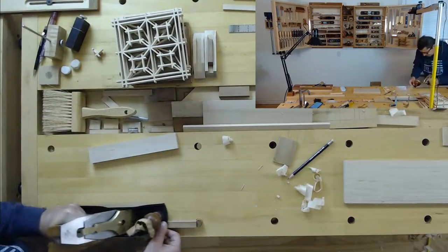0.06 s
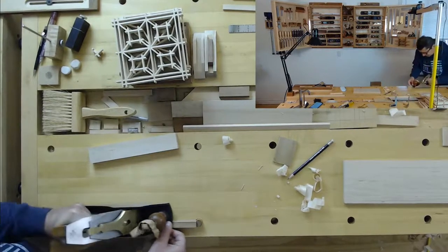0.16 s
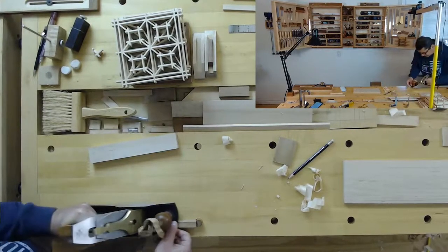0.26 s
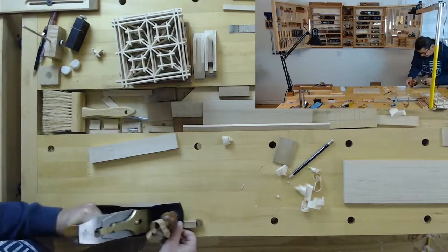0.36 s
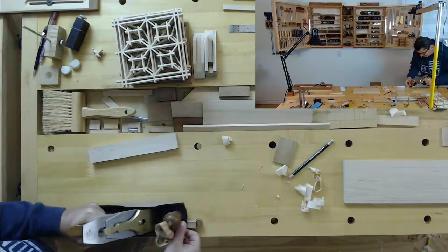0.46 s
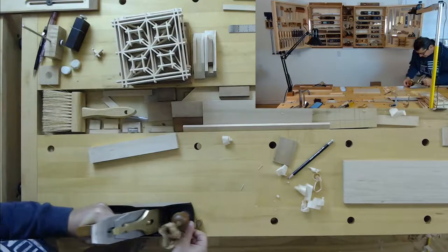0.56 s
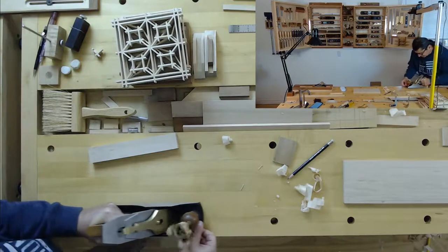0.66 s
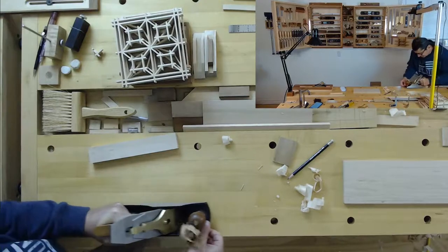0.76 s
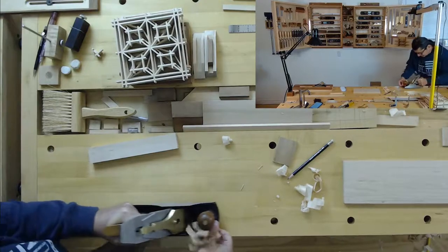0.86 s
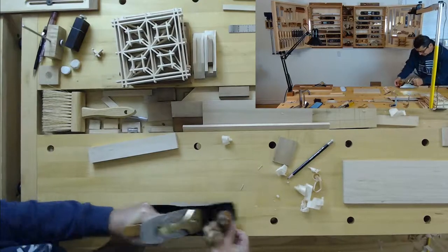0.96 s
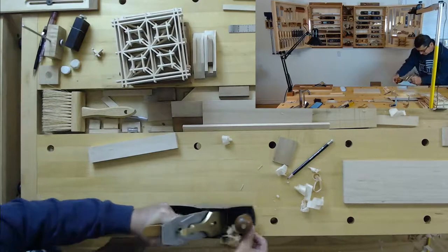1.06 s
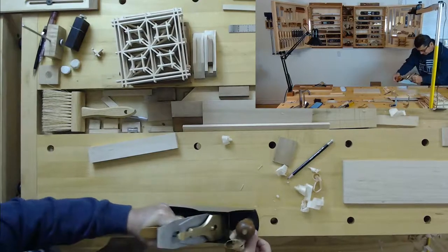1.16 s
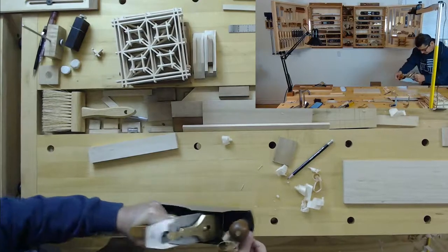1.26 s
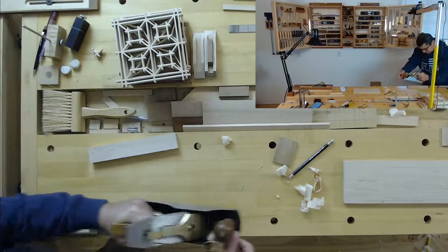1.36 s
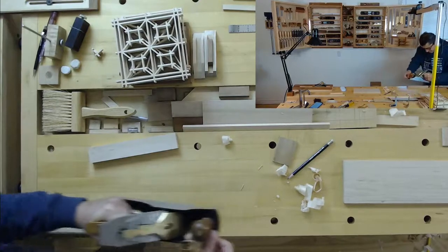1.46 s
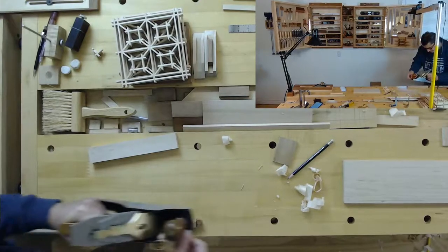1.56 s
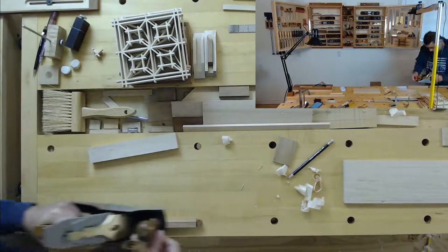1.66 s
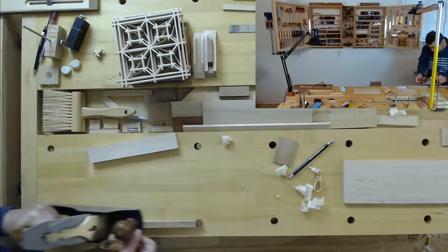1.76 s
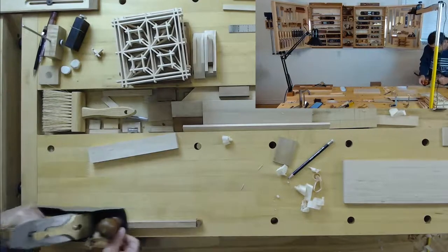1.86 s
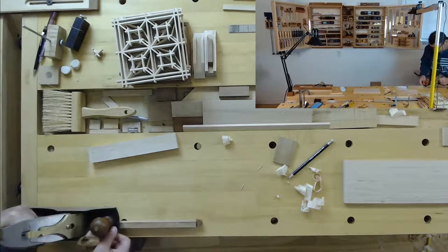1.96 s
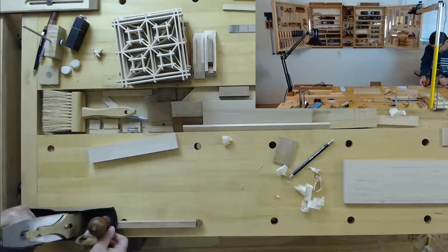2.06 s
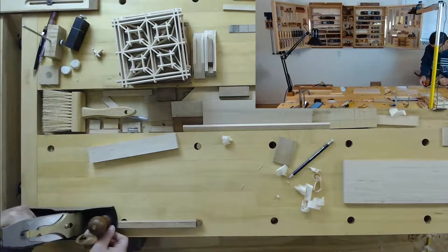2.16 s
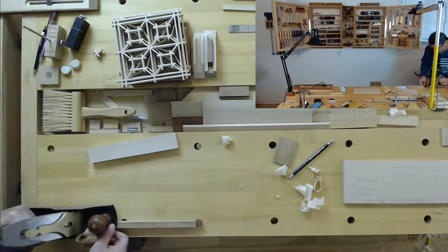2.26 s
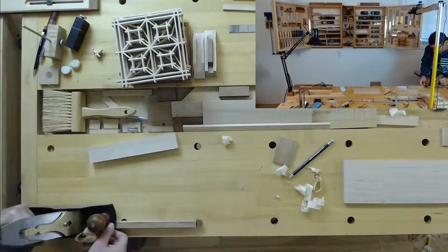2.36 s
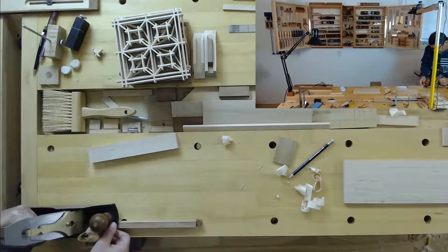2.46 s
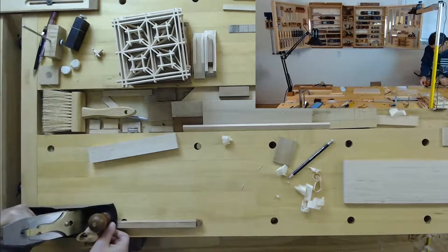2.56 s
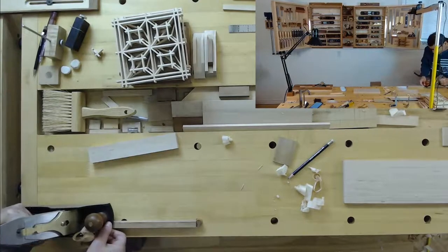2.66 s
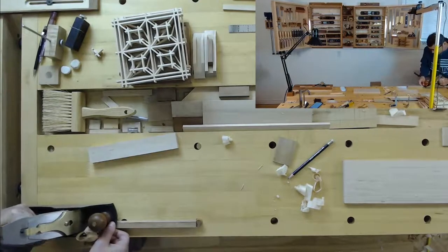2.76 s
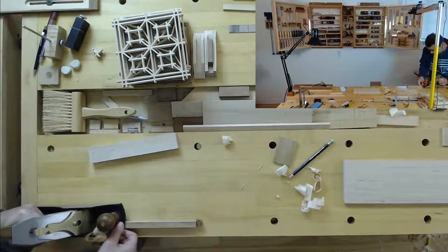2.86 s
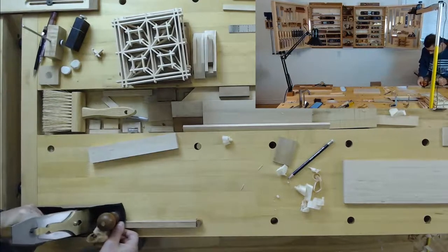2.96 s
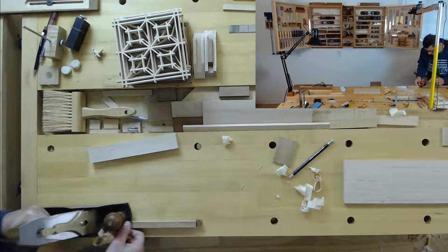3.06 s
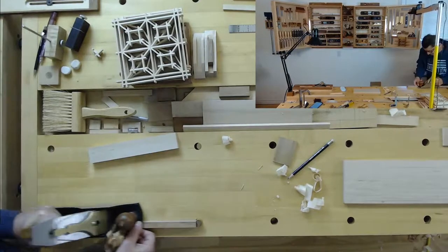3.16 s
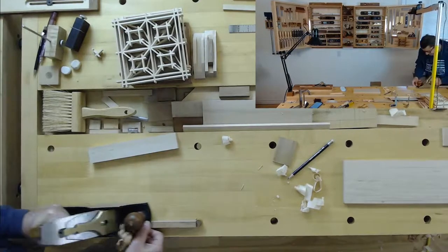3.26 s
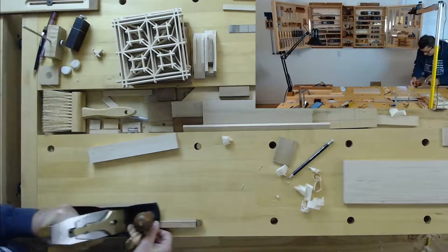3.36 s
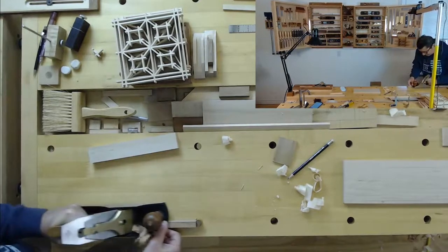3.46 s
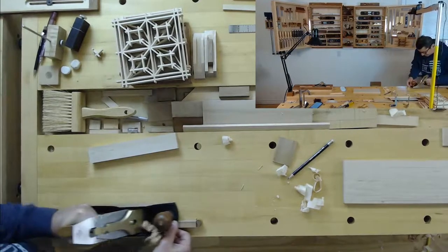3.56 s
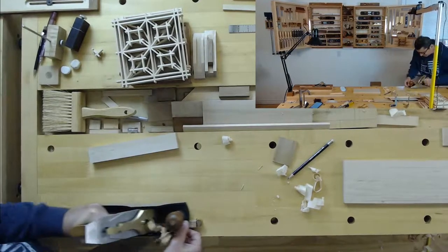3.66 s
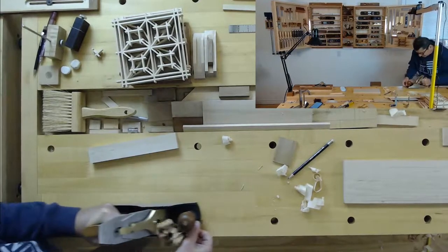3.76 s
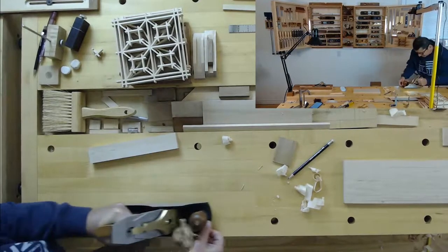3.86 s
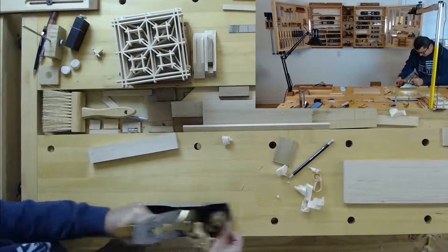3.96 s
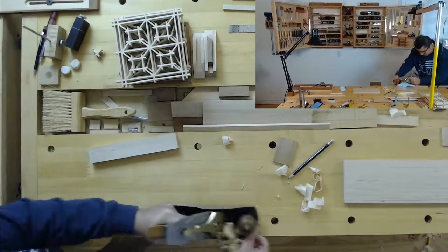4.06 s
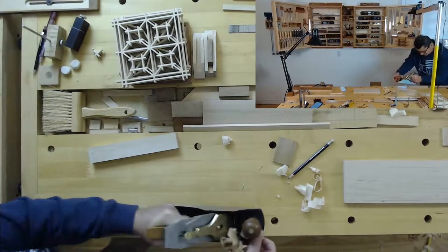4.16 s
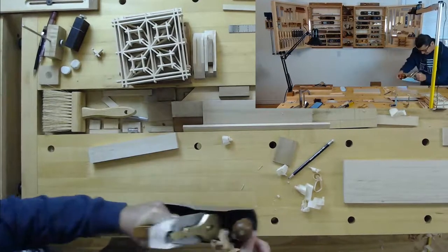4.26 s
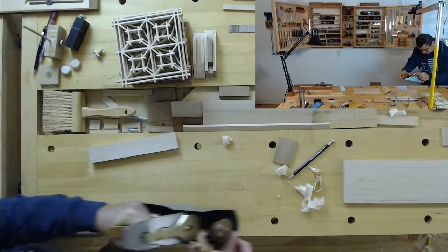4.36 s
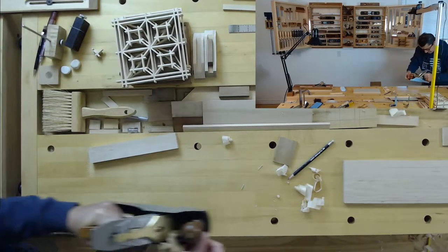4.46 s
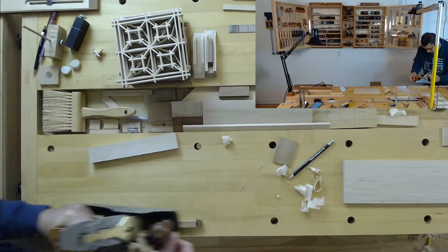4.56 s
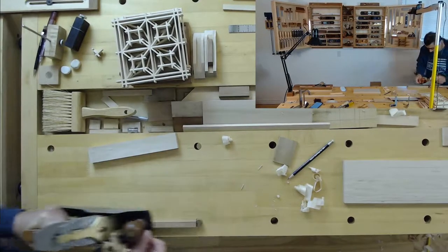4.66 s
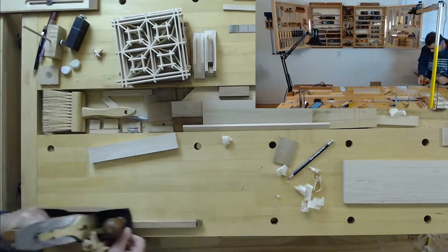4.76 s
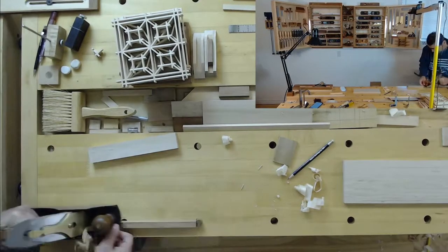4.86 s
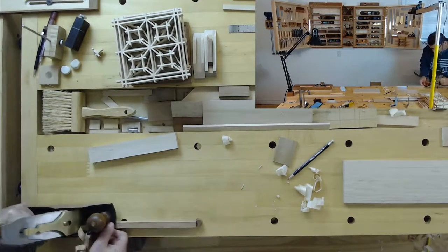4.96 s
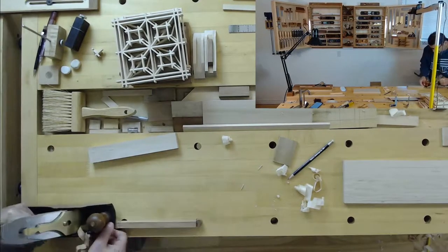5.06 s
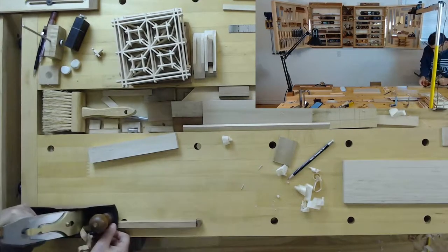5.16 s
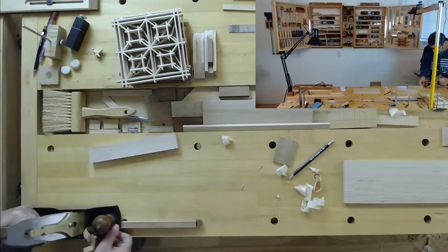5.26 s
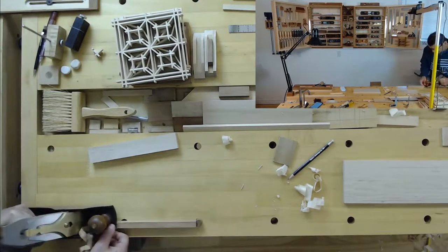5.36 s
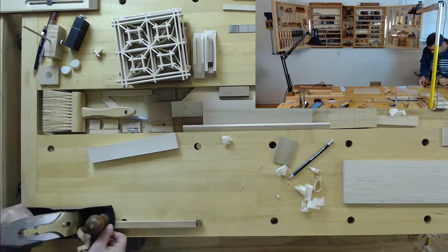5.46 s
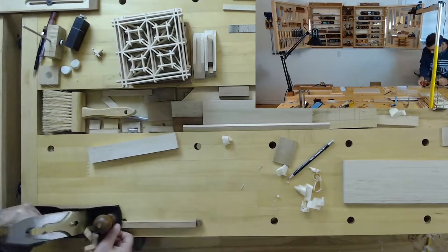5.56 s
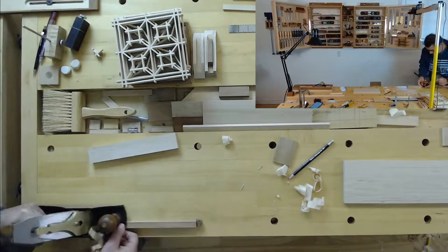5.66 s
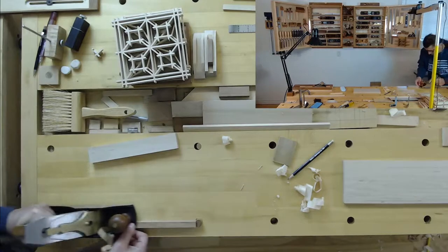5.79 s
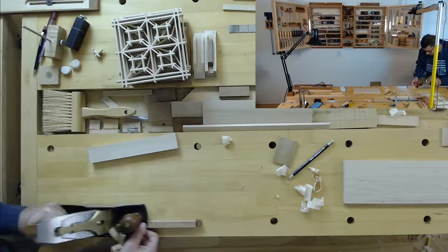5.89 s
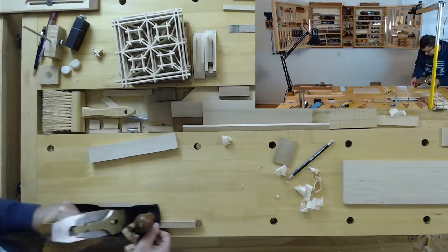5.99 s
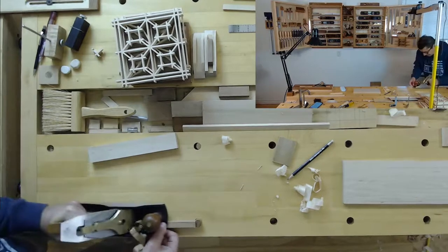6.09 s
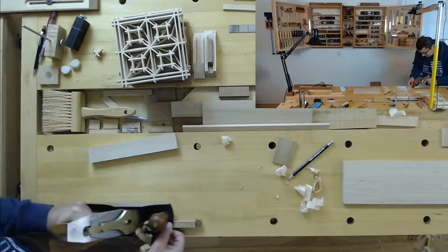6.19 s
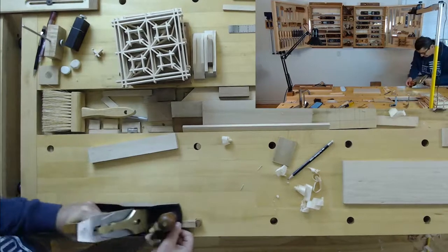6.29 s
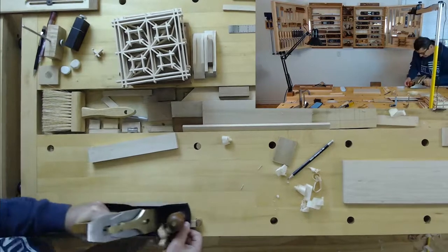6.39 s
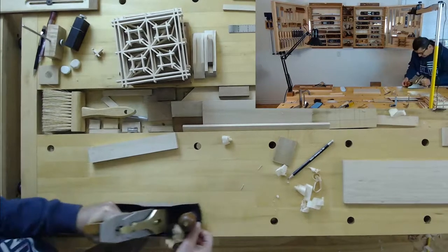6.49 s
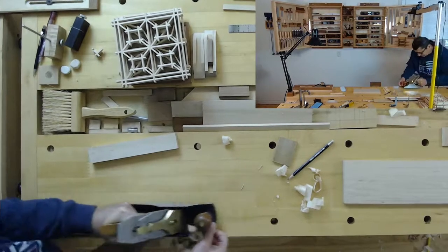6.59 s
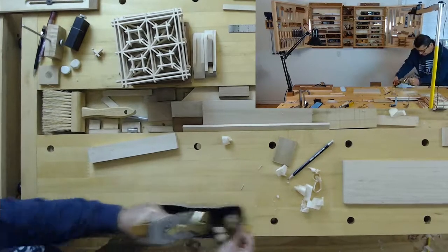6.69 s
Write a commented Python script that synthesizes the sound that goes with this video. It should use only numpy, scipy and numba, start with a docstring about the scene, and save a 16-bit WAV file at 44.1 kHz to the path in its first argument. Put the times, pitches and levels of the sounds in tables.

```python
"""Hand plane in a bare workshop.

One distant microphone hears a metal plane pushed three times along a strip of wood on a heavy bench.
Fibres snap at the blade and ring plane and bench, and the shaving hisses out. Between strokes the plane
is set down with knocks, dry shavings crack, sole and sleeve brush. The bare room echoes, and the bench,
shoved by arms and body, sways at its lowest note, which reaches the microphone through the floor."""
import sys
import numpy as np
from scipy import signal
from scipy.io import wavfile
from scipy.ndimage import uniform_filter1d
from numba import njit

SR = 44100
rng = np.random.default_rng(int(sys.argv[2]) if len(sys.argv) > 2 else 0)


def pcm_store(signal):
    """Save signal as 16-bit PCM."""
    levels = np.round(np.clip(np.atleast_2d(signal), -1, 1) * 32767)
    wavfile.write(sys.argv[1], SR, levels.astype(np.int16).T)


N = 296793

# One list a stroke. Each row: time in seconds, then blade bite, strip groan and hiss in dB.
STROKES = [
    [(0.0, -55.5, -35.5, -56.5), (0.11, -49, -37, -52), (0.32, -46, -36, -52), (0.42, -60, -40, -57.5),
     (0.49, -35, -39.5, -42.5), (0.58, -41.5, -34, -47), (0.72, -45.5, -37.5, -50),
     (0.8, -37.5, -39.5, -45), (0.88, -45, -28.5, -62)],
    [(2.9, -62, -69, -60.5), (2.95, -45.5, -38, -49.5), (3.08, -43.5, -43.5, -49),
     (3.21, -43.5, -39.5, -51), (3.28, -44.5, -44.5, -47.5), (3.43, -41, -37, -47.5),
     (3.51, -34.5, -44.5, -45.5), (3.62, -38.5, -38.5, -43), (3.75, -38.5, -40, -44),
     (3.85, -36, -39, -38.5), (3.9, -35, -29, -58)],
    [(5.64, -59, -64, -59), (5.67, -48.5, -51, -47.5), (5.75, -47.5, -43, -49.5), (5.91, -44, -51, -47),
     (6.07, -50, -37, -55), (6.12, -44, -41, -49.5), (6.18, -41, -38.5, -48.5), (6.26, -42.5, -40.5, -46.5),
     (6.34, -39, -38.5, -46), (6.44, -39.5, -40, -40), (6.52, -35.5, -46, -39.5), (6.575, -31, -32, -33.5),
     (6.61, -55, -29.5, -77), (6.67, -42, -55, -65)],
]
# Notes that move during the cut. Each row: time in seconds, pitch in Hz.
BLADE_HZ = [(0.1, 825), (0.48, 1180), (0.58, 765), (0.72, 720), (0.8, 1000), (0.86, 820), (2.95, 640),
            (3.1, 1050), (3.3, 950), (3.44, 785), (3.49, 1530), (3.58, 1250), (3.68, 955), (3.76, 750),
            (3.87, 1120), (5.7, 790), (5.85, 1150), (5.92, 1570), (5.96, 1130), (6.1, 520), (6.22, 860),
            (6.4, 850), (6.47, 1080), (6.57, 1335), (6.67, 1320)]  # the part of the plane's ring that the loaded blade favours
STRIP_HZ = [(0.1, 375), (0.24, 347), (0.33, 267), (0.46, 230), (0.52, 320), (0.8, 307), (2.95, 354),
            (3.5, 327), (5.75, 380), (6.3, 344)]  # set by where the sole presses on the strip
CURL_HZ = [(0.12, 5940), (0.25, 4700), (0.5, 3760), (0.9, 3600), (2.93, 4470), (3.2, 5300), (3.4, 5500),
           (3.52, 4200), (3.65, 3500), (3.9, 3450), (5.66, 4400), (5.92, 5100), (6.1, 5450), (6.25, 4400),
           (6.4, 3820), (6.6, 3700)]  # the shaving is a small hollow whose note drops as it rolls up
# Treble near 8 kHz within the hiss. Each row: time in seconds, relative level in dB.
SHEEN_DB = [(0.05, -23), (0.25, -2), (0.5, -2), (0.77, 7), (0.86, 5), (2.95, 6), (3.07, 6), (3.25, -1),
            (3.5, -12), (3.78, 4.5), (3.85, 0), (3.9, -9), (5.7, 4.5), (5.84, 2), (6.08, -8), (6.25, -6),
            (6.45, 1), (6.6, 0)]

# Resonances. Each row: centre in Hz, width in Hz, gain in dB.
PLANE_MODES = [(562, 58, -5.5), (689, 64, -1.5), (763, 65, -1), (937, 85, -6), (1037, 56, -4.5),
               (1109, 95, -5), (1237, 81, -3.5), (1362, 110, -4.5), (1481, 177, -7), (1640, 210, -15)]
BENCH_MODES = [(124.3, 22.4, -10), (141.7, 11, -9), (231, 60, -3.5), (308.2, 38, 2.5), (409, 49, -1.5),
               (466, 167, -8.5)]
FIBRE_MODES = [(1820, 255, 4.5), (2170, 180, 5), (2445, 244, 3.5), (2950, 550, 1.5), (3794, 550, -4),
               (4500, 300, -6.5)]
SHAVING_MODES = [(4730, 2140, -4.5), (6420, 960, 0.5), (7110, 850, -1)]
SHEEN_MODES = [(7880, 500, -6.5), (8370, 1130, -11), (8950, 370, -5.5)]
HISS_TOP_MODES = [(11000, 1300, -10), (12900, 710, 7), (13700, 1700, 0.5)]
STRUCK_STRIP_MODES = [(447, 45, -1), (593, 74, 0), (706, 104, 1), (920, 120, -6.5)]
STRUCK_PLANE_MODES = [(1050, 146, -5), (1200, 130, -1), (1357, 123, -2), (1770, 550, -13.5),
                      (2270, 620, -15.5)]
HEEL_MODES = [(335, 104, -0.98), (485, 100, -2), (695, 155, 1)]  # the heel lands flat and dull
FRAME_MODES = [(67, 10, 2), (125.6, 49, 4.9)]
CLICK_MODES = [(3080, 1500, 0.5), (6650, 3500, -4), (12500, 6000, -18)]  # dry contact, too short to ring
IRON_MODES = [(2090, 220, 3), (2550, 450, -4.5)]
SLEEVE_MODES = [(1250, 690, 20.5), (3150, 1800, 16.5), (6800, 1500, -2)]
PAPERY_MODES = [(6750, 2900, 12), (12000, 8500, -11)]

# Arms and body shove the bench. Each row: time of full swing in seconds, level in dB, hold in seconds.
SHOVES = [(0.0, -36, 0.056), (0.39, -35, .01), (0.51, -36, .02), (0.67, -32.5, 0.2), (0.94, -22, 0.0083),
          (1.07, -29, 0.088), (1.33, -36.5, 0.1), (2.1, -37, 0.17), (2.47, -37, 0.12), (2.83, -24.5, 0.17),
          (3.3, -30, 0.018), (3.47, -33.5, 0.038), (3.8, -33, .01), (3.94, -30, 0.087),
          (4.14, -34.5, 0.0078), (4.27, -39, .02), (4.5, -42.5, 0.0093), (4.67, -43.5, .01),
          (4.97, -34, 0.092), (5.17, -28, 0.0048), (5.42, -37.5, 0.028), (5.6, -25.5, 0.2),
          (5.99, -20.5, 0.16), (6.26, -27, 0.21), (6.67, -30, 0.016)]
# The lowest note of the bench. Each row: time in seconds, pitch in Hz.
SWAY_HZ = [(0.0, 28.96), (5.6, 29.43), (5.98, 31.4), (6.73, 32.8)]
# Room tone. Each row: frequency in Hz, relative spectral density in dB.
ROOM_TONE = [(24, -29), (40, 4), (83, -2.5), (120, -27), (166, -7.5), (399, -15), (440, -11), (552, -19),
             (1830, -26), (2730, -33), (15700, -41.5)]
# The blade catches. Each row: peak time in seconds, level in dB, rise and fade in seconds.
CATCHES = [(0.46, -41, .012, 0.026), (0.79, -41, 0.02, 0.05), (0.834, -34.5, .012, 0.018),
           (3.066, -36.5, 0.0072, 0.033), (3.48, -44, .015, 0.032), (3.871, -30.5, 0.033, 0.018),
           (5.814, -39.5, 0.0076, 0.014), (5.915, -35, 0.0087, 0.028), (6.565, -32.5, .015, 0.026)]
# Plane meets wood. Each row: time in seconds, level in dB, then offsets in dB for the plane's ring,
# bench top, thud, click and heel.
KNOCKS = [(0.845, -31, -6, -16, -2, -22, -6), (2.039, -29.5, 1, -23.5, -20, -34, -7.5),
          (2.157, -47.5, 0, -18, 4.5, -20, -11), (2.617, -60, 0, 2, 7, -11, -6),
          (2.69, -60, 0, 9, 4, -6, -6), (2.778, -29, -3.5, -1.5, 0.5, -8.5, 4.5),
          (3.885, -22, 1, -5.5, -15, -8.5, -5), (4.896, -27.5, 0, -18, -16, -26, -6),
          (5.389, -54, 2, 3.5, -2, -7, -1), (5.525, -22, 0.5, -14.5, -12, -13.5, -3.5),
          (6.581, -21, -5, -12, -18, -26, -5)]
# Dry shavings crack. Each row: time in seconds, level in dB, centre in Hz.
SHAVING_CRACKS = [(1.252, -45, 3170), (1.4994, -56, 4030), (4.264, -46, 5220), (4.5251, -49.5, 5000),
                  (4.6725, -51.5, 7070), (4.931, -62, 3560), (5.387, -54, 5000), (5.408, -33.5, 6860),
                  (5.408, -33, 3300)]
# Sole and sleeve brush. Each row: peak time in seconds, level in dB, rise in seconds, rustle offset in dB.
BRUSHES = [(1.51, -68, 0.073, -7), (1.76, -73, 0.28, -1), (2.17, -58, 0.099, -9), (2.51, -61, 0.053, -7),
           (2.73, -59.5, 0.1, -4.5), (4.35, -67, 0.027, -12), (4.53, -74, .06, -3), (4.7, -71, .05, 3),
           (4.88, -68.5, 0.55, 0.5), (5.15, -62, 0.4, -12), (5.31, -63.5, 0.14, -6), (5.5, -57, 0.11, -3)]
# The workshop's echo. Each row: frequency in Hz, seconds to fall 60 dB, relative level in dB.
ROOM_ECHO = [(99, 0.46, 4), (327, 0.89, -0.5), (1090, 0.97, -3.5), (2980, 0.83, -1.5), (6460, 0.76, -3.5),
             (9000, 0.48, -2), (11300, 0.33, -2.5), (15200, 0.52, 4.5)]

BITE_DB, HISS_DB, TEAR_DB = -42, -48, -44  # an ordinary cut
TEAR_PER_BITE, TEAR_PER_HISS = 0.15, 0.98  # dB per dB
SHOVE_RISE_S, SWAY_FADE_DB_S, SWAY_REST_DB = 0.17, 103, -55
CRACK_S, SETTLE_S = 0.0042, 0.011  # how fast the grit of a crack, and of a settling sole, dies away
HEEL_DELAY_S = 0.017  # the toe lands first
WOOD_HZ = 3500  # wood is too soft to pass on more
BRUSH_FADE_DB_S = 100
ECHO_DB, ROOM_TONE_DB, TOP_HZ = 1.5, -54.5, 15730


def undb(db):
    """Decibels to amplitude."""
    return 10 ** (np.asarray(db) / 20)


def unit(x):
    """Scale to an RMS of one."""
    return x / np.sqrt(np.mean(x ** 2))


def follow(curve):
    """A curve of (seconds, value) points, read at every sample."""
    return np.interp(np.arange(N) / SR, *np.transpose(curve))


def walk(rate):
    """Random levels, a new one every 1 / rate seconds, slewed; spread near 1."""
    step = int(SR / rate)
    return uniform_filter1d(np.repeat(rng.standard_normal(N // step + 1), step), step)[:N]


def snaps(rate, scatter_db):
    """Fibres break at random, some harder than others, none beyond what the wood can hold."""
    hit = rng.random(N) < rate / SR
    return hit * undb(scatter_db * np.minimum(rng.exponential(size=N), 4)) * rng.choice([-1, 1], N)


def ring(x, modes):
    """Sum of two-pole resonances; neighbours swing against each other."""
    return sum((-1) ** k * undb(db) * signal.lfilter(*signal.iirpeak(hz, hz / width, SR), x)
               for k, (hz, width, db) in enumerate(modes))


def wavering_ring(x, modes, depth_db, rate):
    """Resonances that each swell and sink on their own as the shaving and the grip change."""
    return sum((-1) ** k * undb(depth_db * walk(rate)) * ring(x, [mode]) for k, mode in enumerate(modes))


@njit
def glide(x, hz, width_hz):
    """State-variable band-pass whose centre moves."""
    y, band, low = np.empty(len(x)), 0., 0.
    for i in range(len(x)):
        g, damping = np.tan(np.pi * hz[i] / SR), width_hz / hz[i]
        v = (band + g * (x[i] - low)) / (1 + g * (g + damping))
        band, low, y[i] = 2 * v - band, low + 2 * g * v, damping * v
    return y


def swell(peak_s, db, rise_s, hold_s, fade_db_s):
    """Power of a sound that climbs its last 20 dB in rise_s, holds, then fades evenly."""
    t = np.arange(N) / SR - peak_s
    return undb(db + 20 * np.minimum(t, 0) / rise_s - fade_db_s * np.maximum(t - hold_s, 0)) ** 2


def noise_bands(length):
    """Half-octave noise bands with their centres."""
    for hz in 45 * 2 ** np.arange(0, 8.6, .5):
        sos = signal.butter(2, [hz / 1.19, hz * 1.19], "band", fs=SR, output="sos")
        yield hz, signal.sosfilt(sos, rng.standard_normal(length))


def stroke_levels():
    """Bite, groan and hiss in dB, silent from 20 ms outside each stroke."""
    rows, silent = [], [-120] * 3
    for stroke in STROKES:
        rows += [(stroke[0][0] - .02, *silent), *stroke, (stroke[-1][0] + .02, *silent)]
    times, *levels = np.transpose(rows)
    return [np.interp(np.arange(N) / SR, times, db) for db in levels]


def cutting():
    """Coarse snaps shake the plane, a separate drag of snaps groans in strip and bench, finer ones tear and
    hiss; the grain makes it all stumble."""
    bite_db, groan_db, hiss_db = stroke_levels()
    strip_hz, curl_hz = follow(STRIP_HZ), follow(CURL_HZ)
    grain = undb(1.75 * walk(60))
    coarse, fine = snaps(1300, scatter_db=2.6), snaps(7000, scatter_db=1.5)
    body = wavering_ring(coarse, PLANE_MODES, depth_db=1.15, rate=14)
    plane = undb(bite_db) * (unit(body) + undb(3.5) * unit(glide(body, follow(BLADE_HZ), 510.0)))

    drag = snaps(1500, scatter_db=1.5)
    groan = glide(drag, strip_hz * (1 + 0.069 * walk(40)), 133.0)
    strip = undb(-2) * unit(glide(groan, strip_hz, 135.0))
    bench = undb(groan_db - 2 + 1.3 * walk(45)) * (unit(ring(drag, BENCH_MODES)) + strip)

    tear_db = TEAR_DB + TEAR_PER_BITE * (bite_db - BITE_DB) + TEAR_PER_HISS * (hiss_db - HISS_DB)
    tear = undb(tear_db) * unit(wavering_ring(0.12 * coarse + fine, FIBRE_MODES, depth_db=1.5, rate=14))

    crackle = snaps(6000, scatter_db=2.5)
    curl = undb(1) * unit(glide(glide(crackle, curl_hz, 2100.0), curl_hz, 2100.0))
    sheen = undb(follow(SHEEN_DB) - 6) * unit(ring(crackle, SHEEN_MODES))
    top = undb(-18) * unit(ring(fine, HISS_TOP_MODES))
    hiss_gain = undb(hiss_db + 1.8 * walk(22))
    shaving = undb(-1) * unit(wavering_ring(fine, SHAVING_MODES, depth_db=1.5, rate=8))
    return grain * (plane + bench + tear + hiss_gain * (shaving + curl + sheen + top))


def bench_sway():
    """The bench's slow mode and a rumble come through the floor; each shove sets its own phase."""
    angle = 2 * np.pi * np.cumsum(follow(SWAY_HZ) * (1 + 0.0804 * walk(12))) / SR
    rumble = unit(ring(rng.standard_normal(N), [(39.5, 12.2, 5), (64, 13, -2), (130, 52, -19)]))
    powers = [swell(s, db, SHOVE_RISE_S, hold, SWAY_FADE_DB_S) for s, db, hold in SHOVES]
    phases = np.exp(2j * np.pi * rng.random(len(SHOVES)))
    swing = undb(SWAY_REST_DB) + sum(np.sqrt(power) * phase for power, phase in zip(powers, phases))
    note = np.sqrt(2) * np.imag(np.exp(1j * angle) * swing) * undb(1.3 * walk(18))
    level = np.sqrt(undb(SWAY_REST_DB) ** 2 + sum(powers))
    return note + level * rumble * undb(-14 + 3.8 * walk(6.6))


def room_tone():
    """Hush of the room and the microphone, each band wavering a little."""
    hz, db = np.transpose(ROOM_TONE)
    hush = sum(undb(np.interp(np.log(centre), np.log(hz), db) + 2.05 * walk(8.6)) * band
               for centre, band in noise_bands(N))
    return undb(ROOM_TONE_DB) * unit(hush)


def blade_catches():
    """The blade grips a hard patch or rips out of the end grain: fine snaps surge and drive its note."""
    t = np.arange(N) / SR
    grip = sum(undb(db) * np.exp(np.minimum((t - s) / rise, (s - t) / fade))
               for s, db, rise, fade in CATCHES)
    fine = snaps(6000, scatter_db=1.5)
    tear = unit(ring(fine, FIBRE_MODES))
    hiss = undb(-4) * unit(ring(fine, SHAVING_MODES + SHEEN_MODES))
    top = undb(-31) * unit(ring(fine, HISS_TOP_MODES))
    blade = undb(4) * unit(glide(ring(fine, PLANE_MODES), follow(BLADE_HZ), 340.0))
    return grip * (tear + hiss + top + blade)


def blows(times, levels_db, contact_s):
    """One half-sine push at each time, then four quick weaker bounces as the sole settles."""
    force = np.zeros(N + SR)
    push = np.sin(np.linspace(0, np.pi, int(contact_s * SR) + 3))[1:-1]
    bounce_gaps_s = .0022 * rng.uniform(0.515, 1.49, (len(times), 4))
    for s, db, gaps in zip(times, levels_db, bounce_gaps_s):
        for bounce, delay in enumerate(np.r_[0, np.cumsum(gaps)]):
            at = int((s + delay) * SR)
            force[at:at + len(push)] += undb(db - 3 * bounce) * push / push.sum()
    return force[:N]


def crunch(times, levels_db, fade_s):
    """A short burst of dense grit at each time."""
    t = np.arange(N) / SR
    envelope = sum(undb(db) * (t >= s) * np.exp(-np.maximum(t - s, 0) / fade_s)
                   for s, db in zip(times, levels_db))
    return envelope * unit(snaps(9000, scatter_db=2.5))


def landing(times, db, heel_db):
    """Force of the plane coming down: the toe strikes and grinds, the heel follows."""
    toe = undb(27.5) * blows(times, db, contact_s=.0001) + undb(11.5) * crunch(times, db, SETTLE_S)
    return toe + undb(7.5) * crunch(times + HEEL_DELAY_S, db + heel_db, 1.45 * SETTLE_S)


def plane_knocks():
    """Each blow rings strip and plane, sounds the bench top, thuds in the frame and clicks on contact."""
    times, db, plane_db, top_db, thud_db, click_db, heel_db = np.transpose(KNOCKS)
    strip = ring(landing(times, db, heel_db), STRUCK_STRIP_MODES)
    plane = ring(landing(times, db + plane_db, heel_db), STRUCK_PLANE_MODES)
    heel = undb(8) * ring(crunch(times + HEEL_DELAY_S, db + heel_db, 1.6 * SETTLE_S), HEEL_MODES)
    top = undb(52.5) * ring(blows(times, db + top_db, contact_s=0.0026), BENCH_MODES)
    thud = undb(53.5) * ring(blows(times, db + thud_db, contact_s=0.0073), FRAME_MODES)
    click = undb(8) * ring(crunch(times, db + click_db, 1.9 * CRACK_S), CLICK_MODES)
    iron = undb(15) * ring(crunch(times, db + click_db, SETTLE_S), IRON_MODES)
    softened = signal.lfilter(*signal.butter(2, WOOD_HZ, fs=SR), strip + plane + heel)
    return softened + top + thud + click + iron


def shaving_cracks():
    """Dry shavings crack, each in its own broad band."""
    return sum(ring(crunch([s], [db], CRACK_S), [(hz, 0.77 * hz, -2)]) for s, db, hz in SHAVING_CRACKS)


def brushing():
    """Sole and sleeve rub softly and patchily, with the rustle of loose shavings on top."""
    rub = snaps(5000, scatter_db=2.5)
    dull_power = sum(swell(s, db, rise, 0, BRUSH_FADE_DB_S) for s, db, rise, _ in BRUSHES)
    rustle_power = sum(swell(s, db + offset, rise, 0, BRUSH_FADE_DB_S) for s, db, rise, offset in BRUSHES)
    sleeve = np.sqrt(dull_power) * unit(ring(rub, SLEEVE_MODES))
    rustle = np.sqrt(rustle_power) * unit(ring(rub, PAPERY_MODES))
    return undb(walk(7.3)) * (sleeve + rustle)


def workshop(direct):
    """Far from the bench the echo is a little louder than the direct sound; its middle rings longest."""
    t = np.arange(int(1.2 * SR)) / SR
    hz, t60, db = np.transpose(ROOM_ECHO)
    tail = np.zeros(len(t))
    for centre, band in noise_bands(len(t)):
        band_db, decay_s = (np.interp(np.log(centre), np.log(hz), column) for column in (db, t60))
        tail += band * undb(band_db) * 1000 ** (-t / decay_s)
    tail *= np.clip((t - .003) / 0.0052, 0, 1)
    tail *= undb(ECHO_DB) / np.sqrt(np.sum(tail ** 2))
    lead = SR // 4  # the first stroke is under way, so the room already rings
    echo = signal.fftconvolve(np.r_[direct[:lead], direct], tail)
    return direct + echo[lead:lead + N]


def scene():
    """The work at the bench from across the room, the same in both channels."""
    work = cutting() + blade_catches() + plane_knocks() + shaving_cracks() + brushing()
    at_microphone = workshop(work) + bench_sway() + room_tone()
    return np.array([at_microphone, at_microphone])


def record(dry):
    """One microphone, its top cut steeply."""
    return signal.sosfilt(signal.ellip(12, .2, 90, TOP_HZ, fs=SR, output="sos"), dry)


dry = scene()
out = record(dry)
pcm_store(out)
```